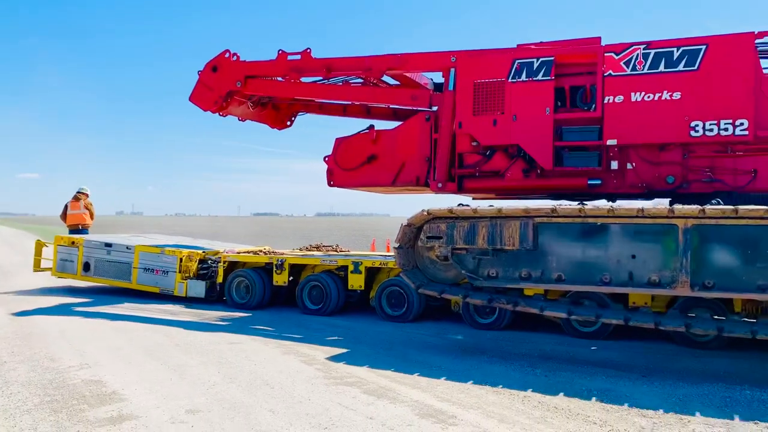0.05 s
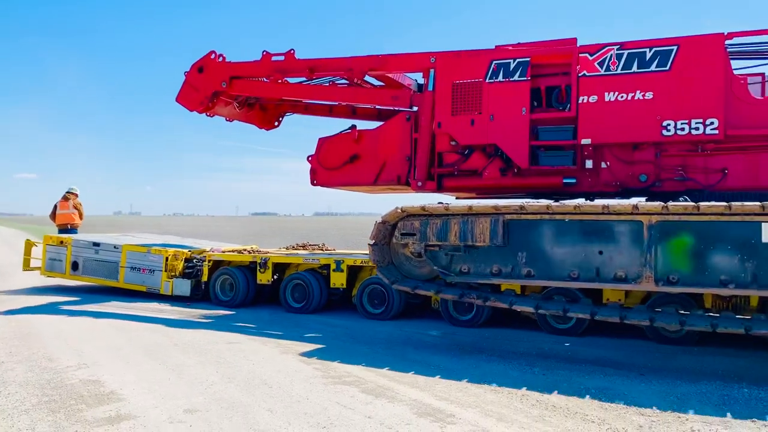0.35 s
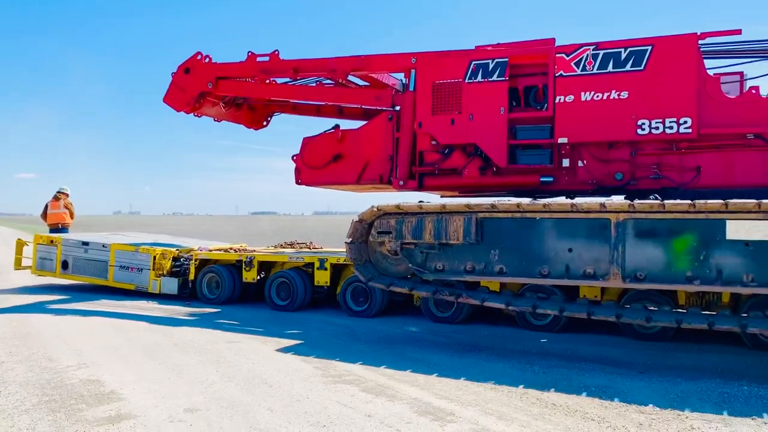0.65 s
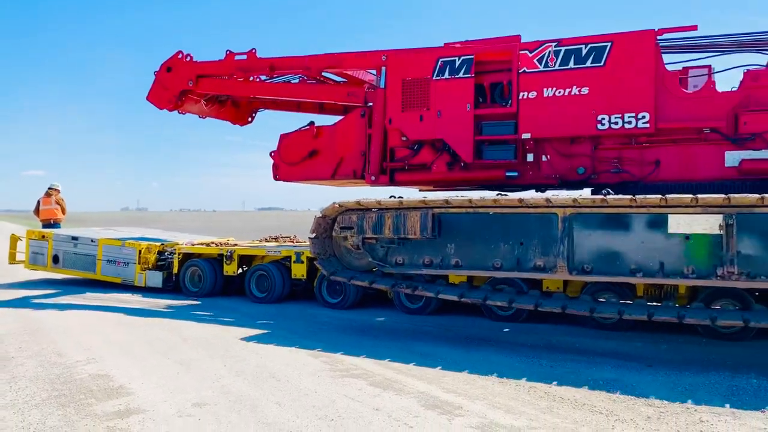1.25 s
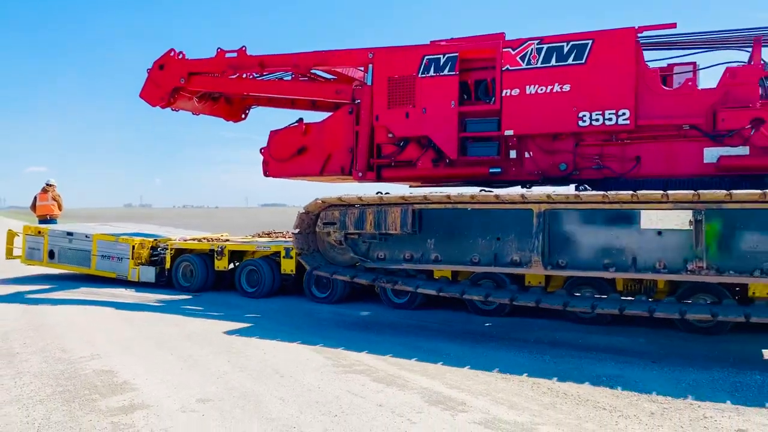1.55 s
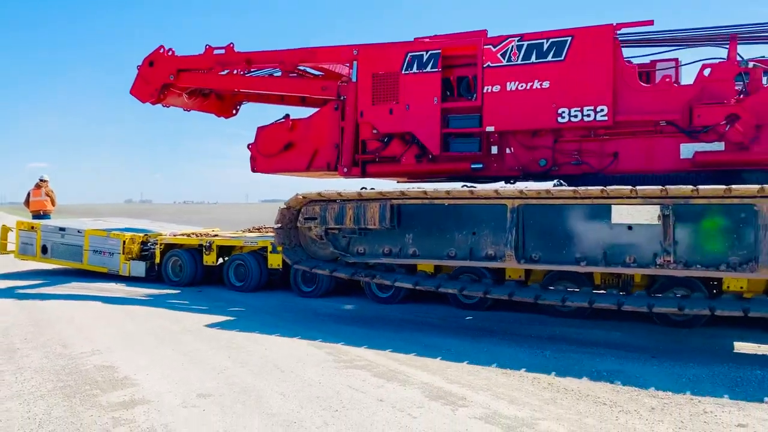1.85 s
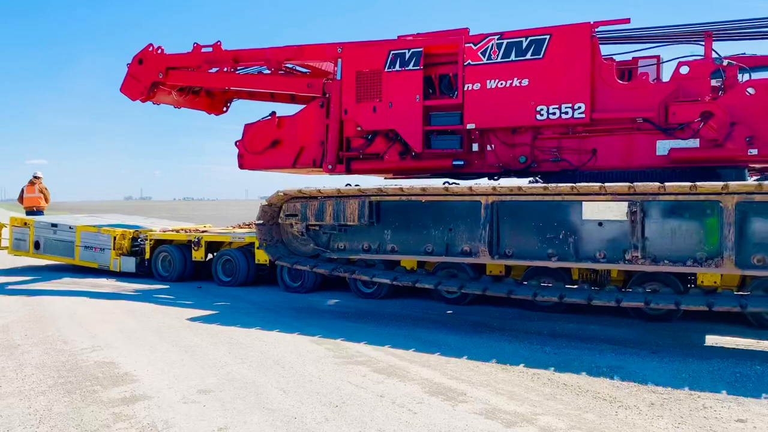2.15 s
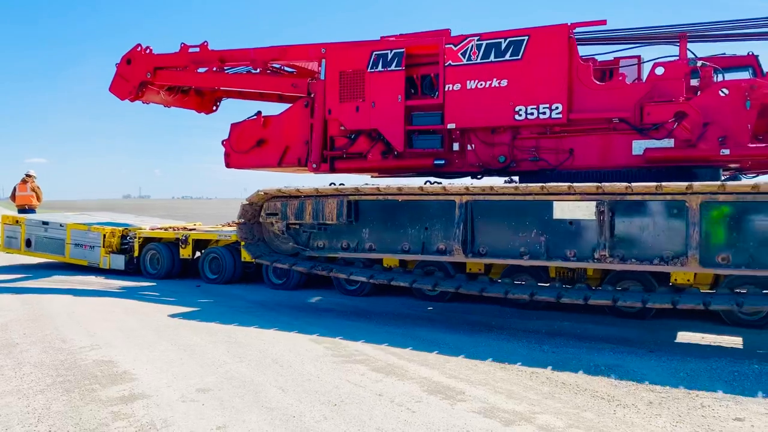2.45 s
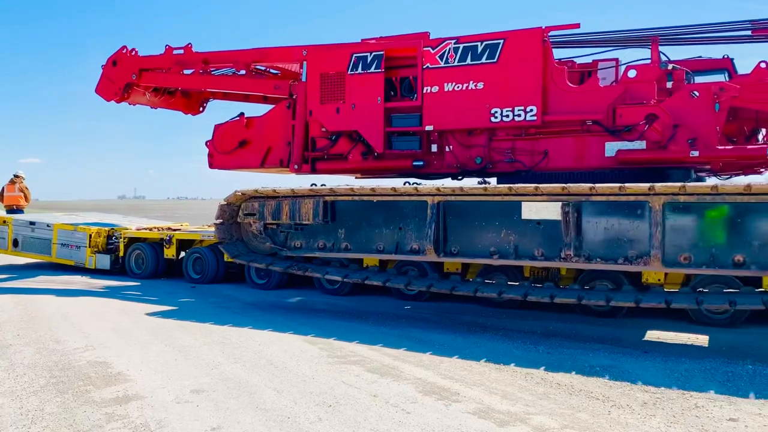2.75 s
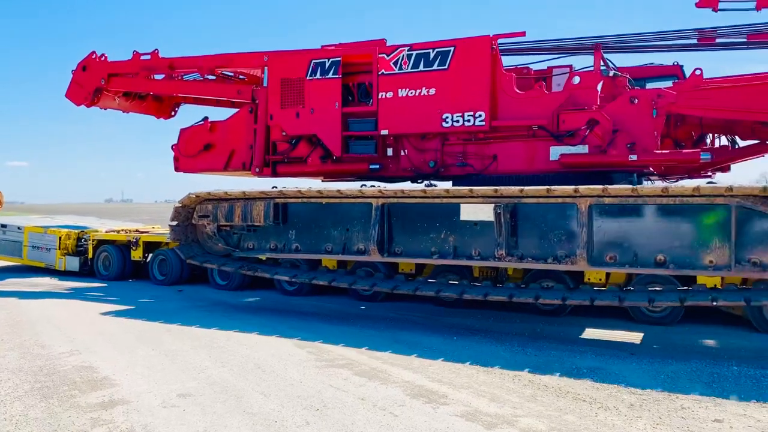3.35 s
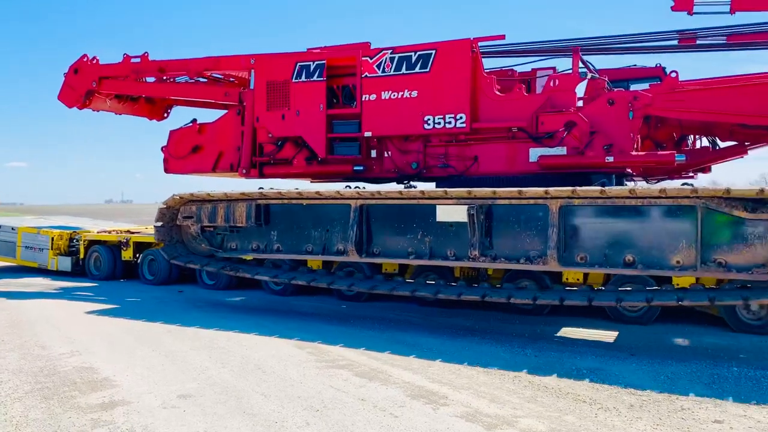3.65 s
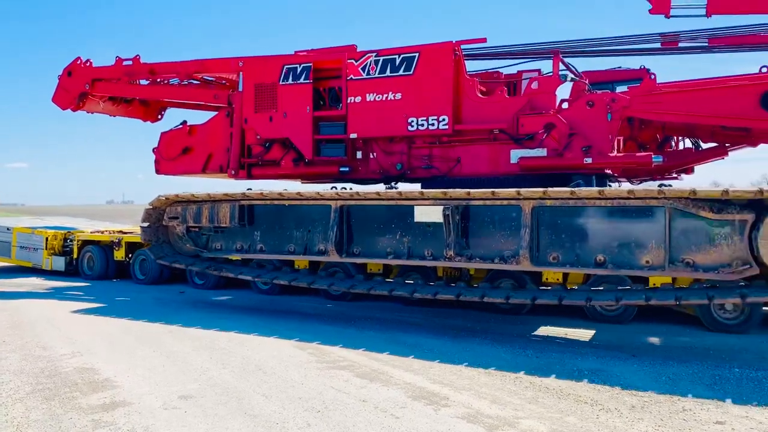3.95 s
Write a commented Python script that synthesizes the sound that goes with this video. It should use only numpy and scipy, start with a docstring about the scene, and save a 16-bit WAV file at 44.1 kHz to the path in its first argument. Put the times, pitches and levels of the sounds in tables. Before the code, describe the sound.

A heavy transporter's diesel engine drones at a nearly steady pitch throughout, with roaring air, light clatter and hiss. A hydraulic whine swells at about 0.3 seconds, wavers and dips around 2.2, then is strong again from 2.8 to 3.5. Wind thumps and rumbles on the microphone from about 1.7 to 2.3 seconds, and again between 2.9 and 3.5, as the vehicle drifts slightly left.

```python
"""A diesel drone and a hydraulic whine: a multi-axle transporter creeps past in open country, carrying
a crane. Its six-cylinder engine fires at a nearly steady rate and drives the piston pump that whines.
Cooling air roars and the machinery clatters and hisses, pulsing with each firing.
Gusts rumble and thump on the two microphone ports."""
import sys
import numpy as np
from scipy import signal
from scipy.fft import rfft, irfft
from scipy.io import wavfile
from scipy.ndimage import uniform_filter1d

SR = 44100
rng = np.random.default_rng(int(sys.argv[2]) if len(sys.argv) > 2 else 0)


def put_to_file(sound):
    """Save the sound as 16-bit audio at rate SR, in the file named by the first command-line argument."""
    columns = np.atleast_2d(sound).T  # one column per channel
    safe = np.clip(columns, -1, 1)
    whole_steps = np.round(safe * 32767)
    wavfile.write(sys.argv[1], SR, whole_steps.astype(np.int16))


N = 176400
TIME_S = np.arange(N) / SR

# Second exhaust harmonic. Each row: time in seconds, level in dB.
DRONE_DB = [(0, -29.5), (.3, -27), (.7, -26), (1.0, -26.5), (1.3, -23.5), (1.55, -24), (1.9, -30),
            (2.25, -27), (2.6, -22), (2.85, -27.5), (3.2, -35), (3.6, -30.5), (4, -30.5)]
# Each row: multiple of the firing rate, starting level in dB, fade in dB per second.
EXHAUST_TONES = [(1, -24.5, 4), (4, -39.5, -0.5), (5, -31.5, 6), (6, -45, -3), (14, -44, 5)]
# Driven shafts and fan. Each row: multiple of the firing rate, level in dB.
SHAFT_TONES = [(4.235, -42), (5.17, -45.5), (5.34, -36), (8.73, -42)]
TONE_WAVER_DB, TONE_JITTER_HZ = 3.5, 1.287

def diesel(firings):
    """Exhaust harmonics of the firing rate, plus the hum of shafts and fan."""
    drone = undb(curve(DRONE_DB)) * tone(2 * firings, waver_db=1.24, jitter_hz=0.9)
    for multiple, db, fade in EXHAUST_TONES:
        drone += undb(db - fade * TIME_S) * tone(multiple * firings, waver_db=0.85, jitter_hz=0.53)
    for multiple, db in SHAFT_TONES:
        drone += undb(db) * tone(multiple * firings, TONE_WAVER_DB, TONE_JITTER_HZ)
    return drone


# Second and third pump harmonics. Each row: time in seconds, level in dB.
WHINE_DB = [(0, -58), (.15, -33.5), (.345, -25), (.362, -19), (.52, -22), (.55, -26), (.7, -23.5),
            (1.0, -24), (1.28, -24.5), (1.42, -31), (1.7, -27.5), (2.0, -27.5), (2.2, -39.5), (2.5, -23.5),
            (2.64, -40), (2.75, -24), (3.1, -21.5), (3.42, -20), (3.65, -25.5), (3.85, -26.5), (4, -38.5)]
OVERTONE_DB = [(0, -38.5), (1.5, -46), (3.0, -42), (3.55, -47), (3.8, -39), (4, -38)]
# Each row: multiple of the piston rate, starting level in dB, fade in dB per second.
WEAK_PUMP_TONES = [(1, -36, 0), (4, -45.5, 1.5), (6, -47, 3), (8, -53, 0)]
STROKES_PER_FIRING = 3.44

def hydraulic_pump(firings):
    """Harmonics of the piston strokes; the loud second one flutters as it swells and fades."""
    strokes = STROKES_PER_FIRING * firings
    flutter_db = 1.66 * walk(rate_hz=40)
    whine = undb(curve(WHINE_DB) + flutter_db) * tone(2 * strokes, waver_db=-0.5, jitter_hz=1.25)
    whine += undb(curve(OVERTONE_DB)) * tone(3 * strokes, waver_db=-0.5, jitter_hz=1.25)
    for multiple, db, fade in WEAK_PUMP_TONES:
        jitter_hz = multiple * TONE_JITTER_HZ / 2
        whine += undb(db - fade * TIME_S) * tone(multiple * strokes, TONE_WAVER_DB, jitter_hz)
    return whine


# Each row: frequency in Hz, relative spectral density in dB.
ROAR_SPECTRUM = [(20, -49), (40, -16), (65, -4), (100, -4.5), (170, -4.5), (220, 2.5), (280, -0.5),
                 (335, -10), (400, -8.5), (460, -6), (560, -6), (650, -8), (740, -8.5), (850, -16),
                 (1100, -24), (1600, -27), (4000, -68)]
CLATTER_SPECTRUM = [(500, -47), (1000, -15), (1250, 3.5), (1550, 3), (1830, 4.5), (2200, -12), (3000, -45),
                    (8000, -52)]
HISS_SPECTRUM = [(400, -35), (1000, -40), (1300, 1.5), (1600, -2.5), (1850, -0.5), (2100, -2), (2380, 0),
                 (2750, -3.5), (3300, -1.5), (4200, -4), (5000, -10), (6300, -15), (8200, -15), (8750, -17),
                 (9300, -19.5), (10400, -16.5), (11500, -34), (13000, -19), (14000, -40)]
# Each row: time in seconds, level in dB.
ROAR_DB = [(0, -20.5), (.3, -19.5), (.8, -20), (1.5, -20.5), (2.1, -21.5), (2.8, -18), (3.3, -20),
           (3.62, -23.5), (3.8, -20), (4, -21)]
HISS_DB = [(0, -33), (.3, -33), (.8, -34.5), (1.5, -35), (2.0, -35), (2.3, -33), (2.8, -33), (3.08, -34.5),
           (3.2, -35.5), (3.45, -35.5), (3.54, -40), (3.66, -34.5), (4, -33)]
CLATTER_DB, CLATTER_FADE_DB_PER_S = -38.5, 2
PUFF_DECAY_CYCLES, THROB_DEPTH, HISS_THROB_DEPTH = 0.041, 0.083, 0.07

def machinery(firings):
    """Exhaust and cooling-air roar, clatter and hiss, puffing with each firing; three unrelated rows."""
    puff = np.exp(-(firings % 1) / PUFF_DECAY_CYCLES)
    puff = (puff - puff.mean()) / puff.std()
    throb = 1 + THROB_DEPTH * puff
    roar = colour(turbulence() * throb, ROAR_SPECTRUM) * undb(curve(ROAR_DB))
    rattle = undb(3 * walk(rate_hz=150))
    clatter = colour(turbulence() * throb * rattle, CLATTER_SPECTRUM)
    clatter *= undb(CLATTER_DB - CLATTER_FADE_DB_PER_S * TIME_S)  # the engine moves off
    hiss = colour(turbulence() * (1 + HISS_THROB_DEPTH * puff), HISS_SPECTRUM)
    return roar + clatter + hiss * undb(curve(HISS_DB))


# Each row: time in seconds, level in dB.
GUST_DB = [(0, -55), (1.0, -38), (1.4, -30), (1.65, -54), (1.72, -23), (1.86, -22), (1.98, -24),
           (2.3, -27.5), (2.45, -38), (2.75, -33), (2.87, -22.5), (3.08, -31), (3.17, -24), (3.3, -17.5),
           (3.42, -20.5), (3.48, -18.5), (3.63, -40), (3.87, -30), (4, -31)]
# Each row: peak time in seconds, thump level in dB, rasp level in dB, decay in seconds.
BUFFETS = [(1.684, -15, -22, 0.016), (1.699, -11, -36, 0.01), (1.727, -5.5, -14, 0.007),
           (1.753, -22, -38, 0.0081), (1.775, -15, -15, .018), (1.858, -12.5, -23, 0.02),
           (1.912, -16, -30, 0.015), (2.13, -31, -28, .02), (2.23, -24.5, -23.5, 0.025),
           (2.316, -12, -18, 0.018), (2.865, -17, -29, .037), (3.15, -15, -46, 0.031),
           (3.30, -23, -31, 0.021), (3.376, -8, -21.5, .018), (3.413, -12, -24, .015),
           (3.475, -34, -17, .018), (3.54, -20, -49, 0.022)]
# Each row: frequency in Hz, relative spectral density in dB.
WIND_SPECTRUM = [(15, -26), (30, -15), (55, 1.5), (120, -1.5), (250, -5), (500, -14), (900, -23.5),
                 (1400, -32), (2200, -46), (8000, -73)]
RASP_SPECTRUM = [(100, -34), (300, 2.5), (500, 7), (750, -3.5), (1050, -9), (1400, -24), (2200, -27),
                 (6000, -59)]
BUFFET_ATTACK_S = 0.0074

def wind():
    """Gusts rumble on the ports; the largest eddies thump, and hard ones rasp across the port's edge."""
    thump_power, rasp_power = 0, 0
    for peak_s, thump_db, rasp_db, decay_s in BUFFETS:
        envelope = np.exp(-np.maximum((peak_s - TIME_S) / BUFFET_ATTACK_S, (TIME_S - peak_s) / decay_s))
        thump_power += (undb(thump_db) * envelope) ** 2
        rasp_power += (undb(rasp_db) * envelope) ** 2
    rumble = eddies(WIND_SPECTRUM) * undb(curve(GUST_DB))
    thumps = hold_level(eddies(WIND_SPECTRUM)) * np.sqrt(thump_power)
    rasps = hold_level(eddies(RASP_SPECTRUM)) * np.sqrt(rasp_power)
    return rumble + thumps + rasps


def eddies(spectrum, unshared_db=-2, swirl_db=2.5):
    """Quickly swirling air, partly shared by the two ports."""
    noise = rng.standard_normal((3, N))
    air = noise[0] + undb(unshared_db) * noise[1:]
    return colour(air * undb(swirl_db * walk(rate_hz=110)), spectrum)


def turbulence(bands=9, flicker_db=1.05, swell_db=0.32):
    """Three unrelated noises whose octaves swell together and flicker alone."""
    noise, flow = rfft(rng.standard_normal((3, N))), 0
    octave = by_bin([(50, 0), (12800, bands - 1)])
    for k in range(bands):
        band = irfft(noise * np.maximum(1 - abs(octave - k), 0), N)
        flow += band * undb(flicker_db * walk(rate_hz=16))
    return flow * undb(swell_db * walk(rate_hz=6.23))


def tone(cycles, waver_db, jitter_hz):
    """A partial near unit rms that wavers in level and pitch."""
    phase = cycles + np.cumsum(jitter_hz * walk(rate_hz=24.94)) / SR + rng.random()
    return np.sqrt(2) * np.sin(2 * np.pi * phase) * undb(waver_db * walk(rate_hz=10))


def walk(rate_hz):
    """Smooth random motion with unit spread."""
    hold = max(int(SR / rate_hz), 2)
    steps = np.repeat(rng.standard_normal(N // hold + 2), hold)
    smooth = uniform_filter1d(uniform_filter1d(steps, hold), hold)[:N]
    return smooth / smooth.std()


def colour(x, spectrum):
    """Filter by a spectrum and scale to unit rms."""
    shaped = irfft(rfft(x) * undb(by_bin(spectrum)), N)
    return shaped / shaped.std()


def hold_level(x, window_s=0.02):
    """Hold a stereo noise at unit running rms."""
    return x / np.sqrt(uniform_filter1d(np.mean(x ** 2, axis=0), int(window_s * SR)))


def undb(db):
    """Decibels to gain."""
    return 10 ** (np.asarray(db) / 20)


def curve(rows):
    """A (seconds, value) table at every sample."""
    return np.interp(TIME_S, *np.array(rows).T)


def by_bin(rows):
    """A (Hz, value) table at every FFT bin, on a log axis."""
    hz, value = np.array(rows).T
    bin_hz = np.maximum(np.arange(N // 2 + 1) * SR / N, 1)
    return np.interp(np.log(bin_hz), np.log(hz), value)


# Each row: frequency in Hz, phase lead of the left port in radians.
PORT_PHASE_RAD = [(20, 0), (100, .05), (250, .4), (600, .9), (850, 1), (1400, 2), (1600, 3.6), (1900, 5.6),
                  (2030, 9.7), (2300, 12.6), (2570, 15), (3050, 15.7), (3600, 17.4), (4200, 18.8),
                  (4600, 19.3), (5300, 21.6), (6500, 20.4), (7100, 18.7), (8000, 16.6), (8800, 15.5),
                  (10000, 12.9), (14000, 12.5)]
# Each row: frequency in Hz, left minus right in dB.
PORT_BALANCE_DB = [(50, 0.5), (200, -1.4), (450, -1), (600, -1.3), (780, 2.5), (1200, 3.5), (1550, -3),
                   (1950, 0.5), (2350, -1.5), (4200, -0.1), (5600, -3.5), (7500, -0.5), (14000, 0)]
# Each row: frequency in Hz, scattered over direct noise in dB.
DIFFUSE_DB = [(50, -1.5), (200, -13.5), (700, -6), (1150, 5), (1600, -7), (2700, -7.5), (4300, -10),
              (5500, 0), (7000, 8.5), (8800, -9), (14000, 40)]

def microphone_ports(tones, noise):
    """The ports differ in phase and level. Noise row 0 arrives direct, rows 1 and 2 scattered."""
    diffuse_ratio = undb(by_bin(DIFFUSE_DB))
    direct_gain = 1 / np.sqrt(1 + diffuse_ratio ** 2)
    sides = np.array([[1], [-1]]) / 2
    direct = (rfft(tones) + direct_gain * rfft(noise[0])) * np.exp(1j * sides * by_bin(PORT_PHASE_RAD))
    scattered = direct_gain * diffuse_ratio * rfft(noise[1:])
    return irfft((direct + scattered) * undb(sides * by_bin(PORT_BALANCE_DB)), N)


# Each row: time in seconds, engine firing rate in Hz.
FIRING_HZ = [(0, 86.74), (.45, 86.65), (1.0, 85.84), (1.3, 86.73), (1.9, 85.95), (2.4, 86.8), (2.75, 87.87),
             (3.1, 87.53), (3.45, 87.9), (3.7, 88.7), (4, 88.76)]
DRIFT_DB_PER_S = 0.24

def scene():
    """One engine speed drives the whole vehicle, which drifts left; the wind blows on its own."""
    firings = np.cumsum(curve(FIRING_HZ)) / SR
    vehicle = microphone_ports(diesel(firings) + hydraulic_pump(firings), machinery(firings))
    pan_db = DRIFT_DB_PER_S * (TIME_S - N / SR / 2)
    return vehicle * undb(np.array([pan_db, -pan_db]) / 2) + wind()


def record(dry, ceiling=0.85, cutoff_hz=14300):
    """The recorder rounds the strongest wind peaks and cuts the top treble."""
    rounded = dry / (1 + (dry / ceiling) ** 6) ** (1 / 6)
    return signal.sosfilt(signal.ellip(8, .2, 80, cutoff_hz, fs=SR, output="sos"), rounded)


dry = scene()
out = record(dry)
put_to_file(out)
```